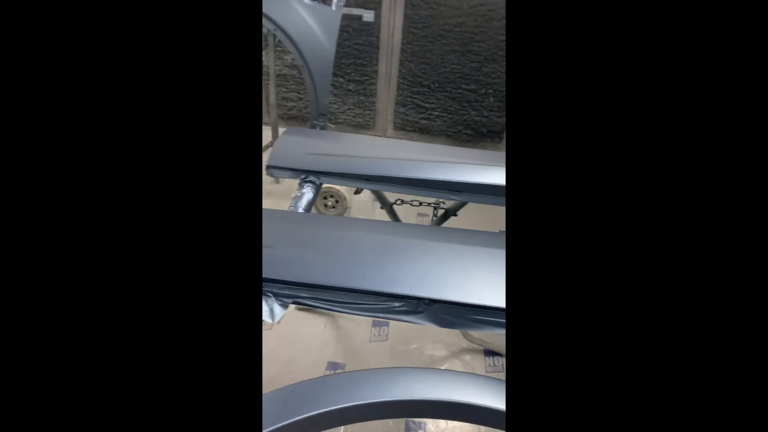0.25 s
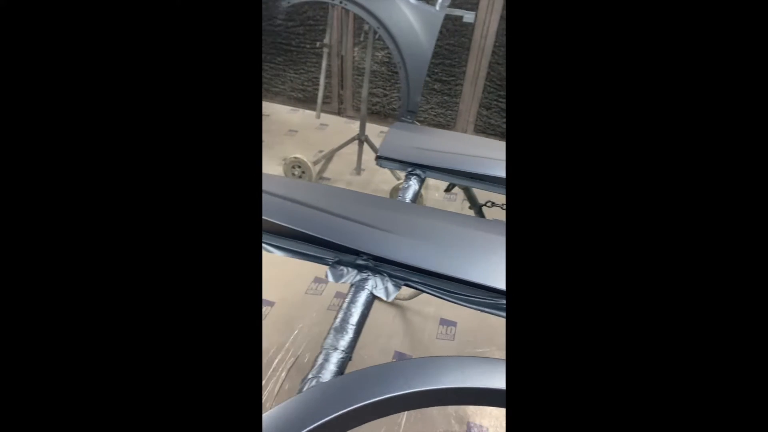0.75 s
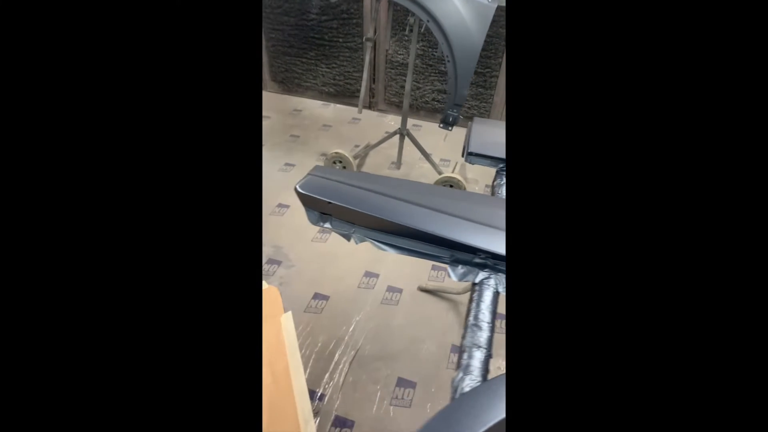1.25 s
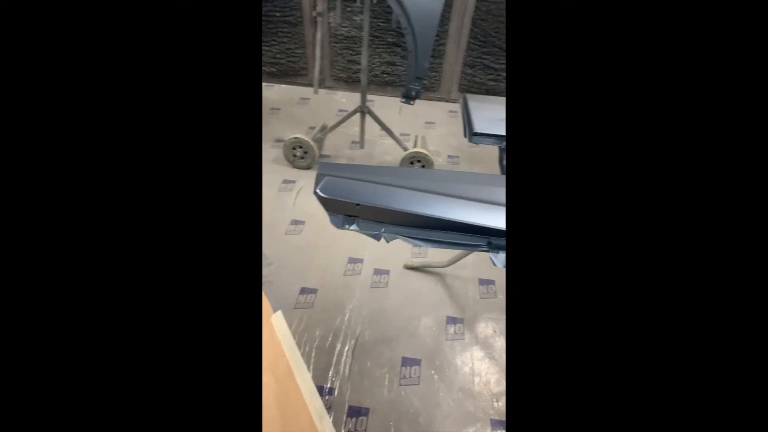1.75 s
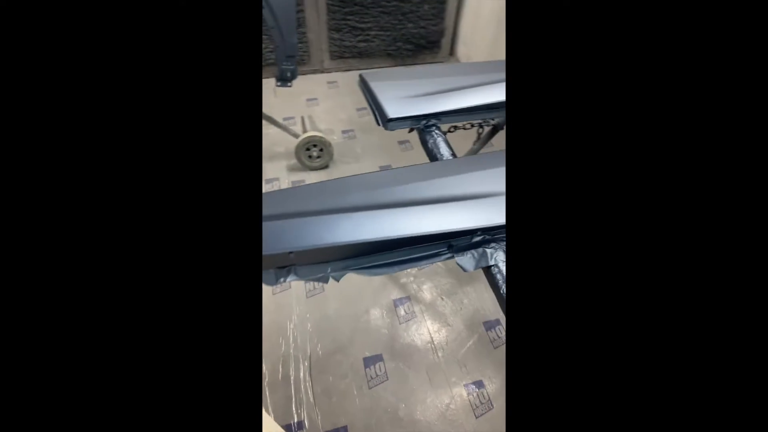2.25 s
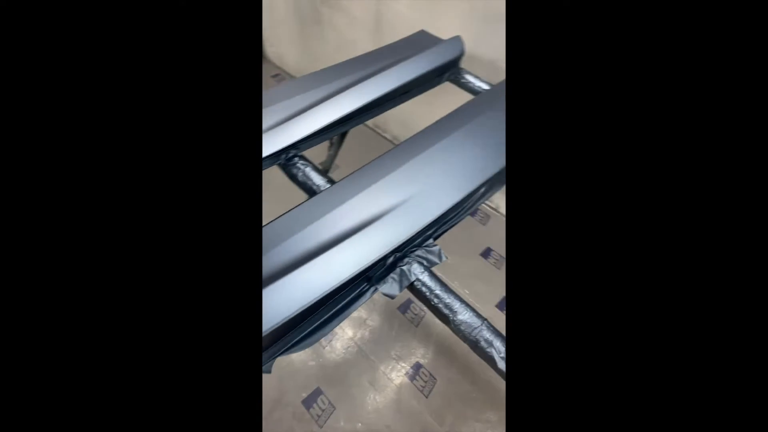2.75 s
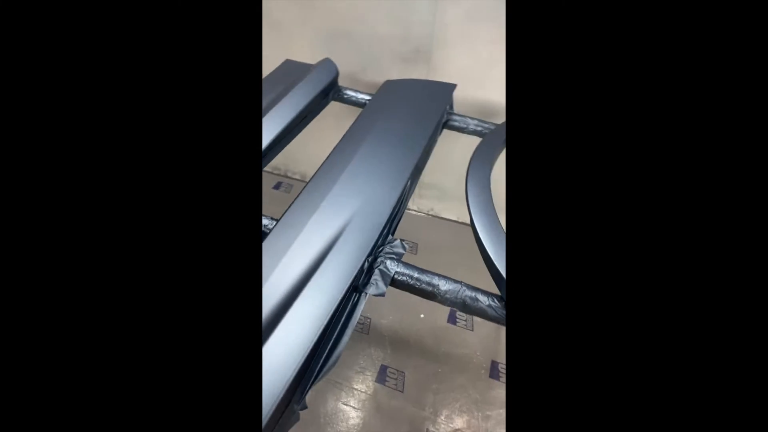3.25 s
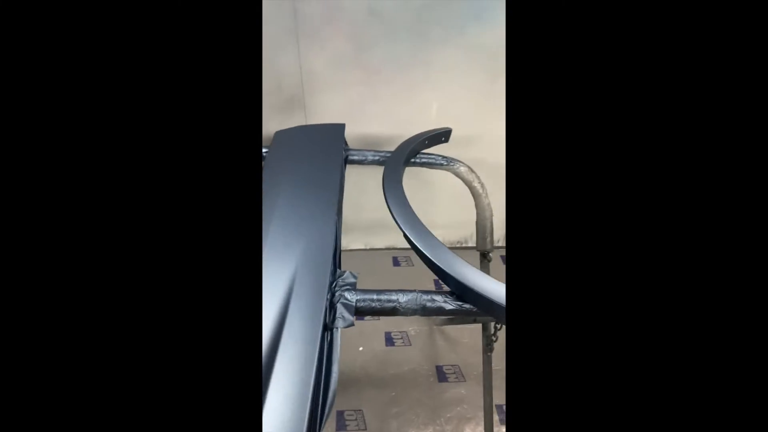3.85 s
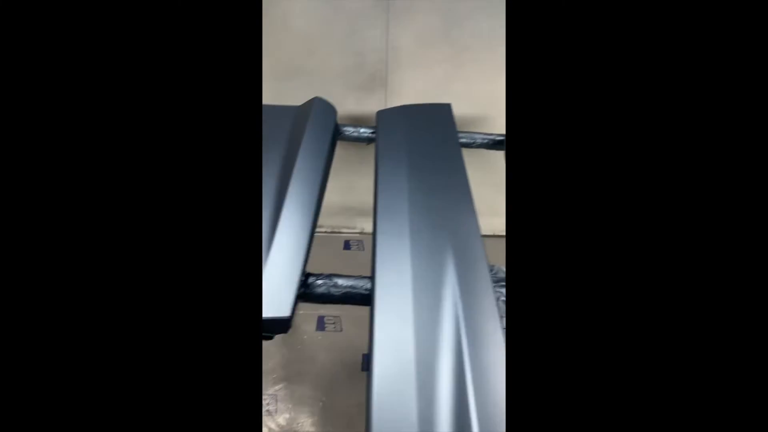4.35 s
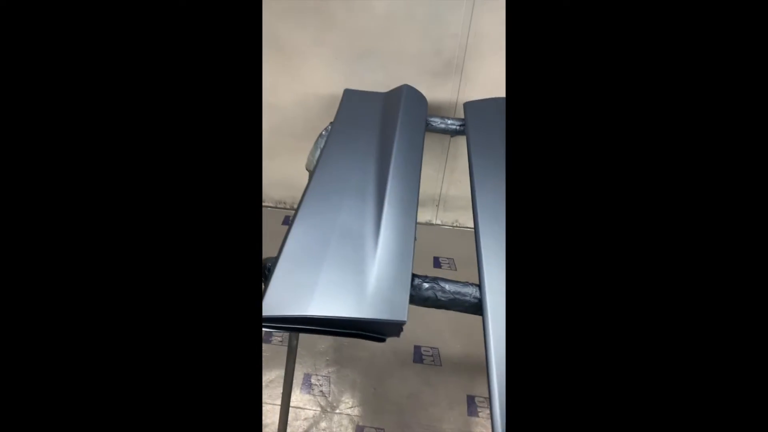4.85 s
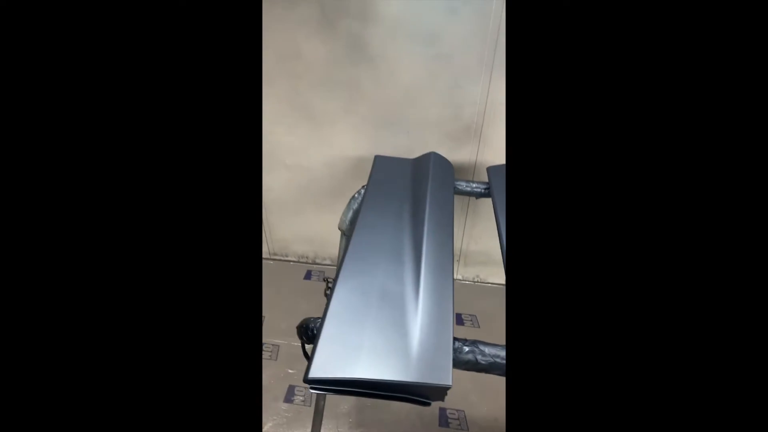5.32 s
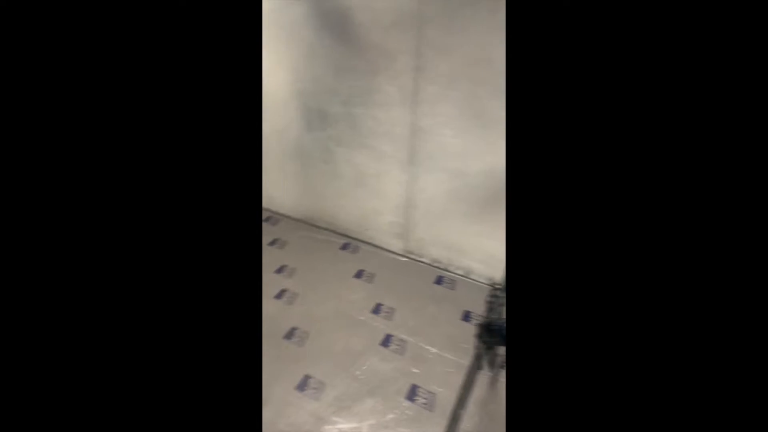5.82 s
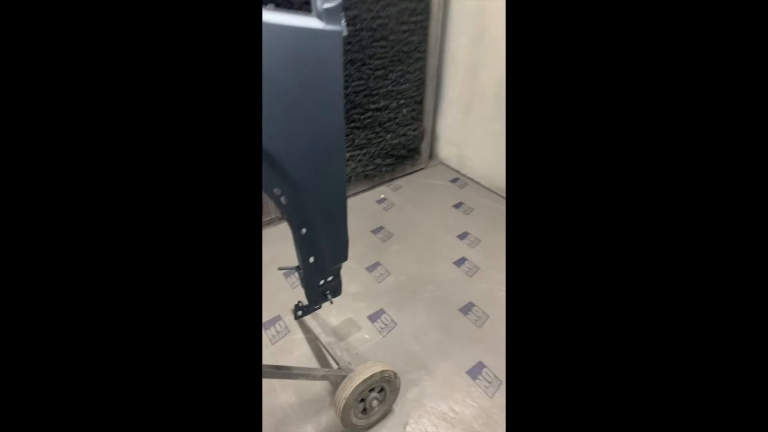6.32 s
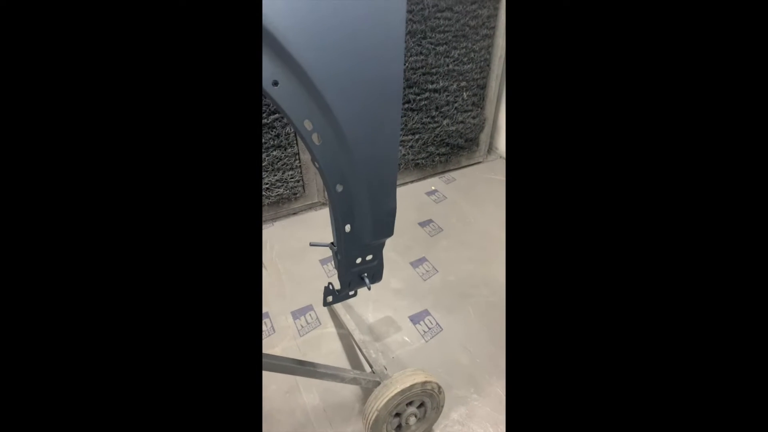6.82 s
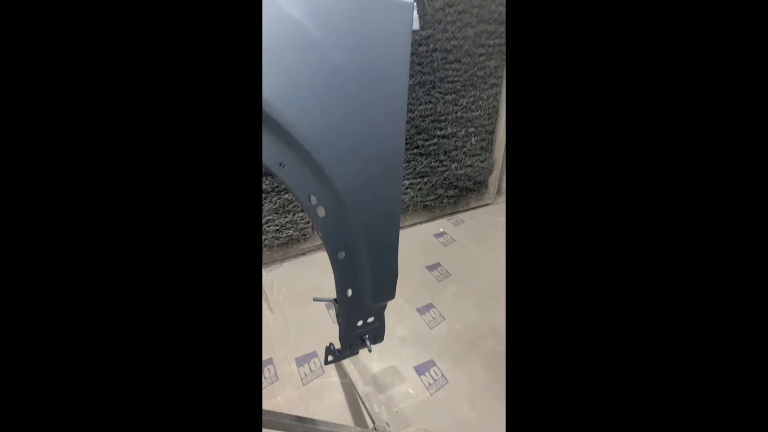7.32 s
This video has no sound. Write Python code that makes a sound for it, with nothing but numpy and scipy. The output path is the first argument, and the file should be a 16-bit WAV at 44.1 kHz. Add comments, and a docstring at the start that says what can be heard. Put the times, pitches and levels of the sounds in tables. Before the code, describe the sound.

Inside a hard-walled spray booth, ventilation roars without pause: dense low turbulent air, a blurred fan hum and a thin hiss from filter mats. The hum starts strong, then fades and surges as the handheld phone moves around painted panels. Faint ticks and rustles of floor sheeting come underfoot, clearest around one and a half seconds. Late on, the deep rumble grows.

```python
"""Inside a spray booth, a phone is carried slowly round painted panels while the ventilation runs steadily.
From the start, turbulent air roars through the booth's low resonances, fans hum and filter mats hiss.
The hum begins strong, then its tones fade and swell along the walk through standing waves and surge briefly.
The floor sheet ticks and rustles faintly under the shoes, most densely near 1.5 s; the hard walls answer.
Late in the walk, after about 6 s, the deep rumble grows towards the far corner."""
import sys
import numpy as np
from scipy import signal
from scipy.fft import rfft, irfft
from scipy.io import wavfile
from scipy.ndimage import uniform_filter1d, minimum_filter1d

SR = 44100
rng = np.random.default_rng(int(sys.argv[2]) if len(sys.argv) > 2 else 0)


def generate_wav(signal):
    """Clip the signal to [-1, 1] and save it as 16-bit WAV at the path in sys.argv[1]."""
    frames = np.transpose(np.atleast_2d(signal))
    scaled = np.clip(frames, -1, 1) * 32767
    pcm = np.round(scaled).astype(np.int16)
    wavfile.write(sys.argv[1], SR, pcm)


N = 334278
TIME = np.arange(N) / SR
HZ = np.fft.rfftfreq(N, 1 / SR)


def gain_of(db):
    """Decibels to amplitude gain."""
    return 10 ** (np.asarray(db) / 20)


def evened(x):
    """Scales a signal to rms 1."""
    return x / np.sqrt(np.mean(abs(x) ** 2) + 1e-20)


def spectrum_curve(points):
    """Joins the points of a spectrum table on a log-frequency axis."""
    hz, value = np.transpose(points)
    return np.interp(np.log(HZ + 1), np.log(hz + 1), value)


def time_curve(points):
    """Joins the points of a time table, sample by sample."""
    s, value = np.transpose(points)
    return np.interp(TIME, s, value)


def wander(rate_hz):
    """Slow random movement of rms 1: noise kept mostly below rate_hz."""
    noise = rfft(rng.standard_normal(N))
    return evened(irfft(noise / (1 + (HZ / rate_hz) ** 4), N))


def port_noise(density_db):
    """Noise spectra at the two microphone ports: alike in the bass, the left port leading higher up."""
    # Likeness of the two ports. Each row: frequency in Hz, coherence from 0 to 1.
    likeness = [(30, .99998), (110, .999), (190, .99), (300, .96), (430, .85), (600, .62), (1050, .55),
                (1400, .64), (2200, .48), (3400, .62), (4200, .9), (4700, .995), (6000, .98), (9000, .99),
                (15000, .99)]
    # Lead of the left port, close to a plain delay in the treble. Each row: frequency in Hz, phase in radians.
    lead = [(0, 0), (330, 0), (500, .3), (1250, .1), (2200, 1.3), (3300, 1.3), (4100, 2), (4700, 3.14),
            (5400, 4.3), (15200, 18.85)]
    shared, other = rfft(rng.standard_normal((2, N)))
    same = np.clip(spectrum_curve(likeness), 0, 1)
    lag = np.exp(-1j * np.interp(HZ, *np.transpose(lead)))
    right = lag * (same * shared + np.sqrt(1 - same ** 2) * other)
    return np.array([shared, right]) * gain_of(density_db) * np.sqrt(SR / 2)


def filter_hiss(shade_hz=7000, follow=1.1, flicker_db=0.5):
    """Air through the filter mats hisses; the highest hiss is the most directional."""
    # Hiss of the mats. Each row: frequency in Hz, density in dB per Hz.
    hiss = [(1000, -100), (3000, -91), (4100, -84.6), (4700, -86), (5600, -85.9), (6500, -87.5),
            (7500, -90), (8200, -87), (9200, -89), (11000, -93), (13000, -94), (15700, -99)]
    # How squarely the phone faces the filters; only the departure from the mean is heard.
    # Each row: time in seconds, hiss in dB before the factor follow.
    facing = [(0.0, -57), (0.74, -58), (1.06, -55.5), (1.33, -58.5), (2.57, -58), (3.02, -56),
              (3.85, -55.5), (4.4, -56), (6.14, -58.5), (7.58, -61)]
    facing_db = time_curve(facing)
    air = port_noise(spectrum_curve(hiss))
    wide = 1 / (1 + (HZ / shade_hz) ** 4)
    beamed = irfft(air * (1 - wide), N)
    beamed = beamed * gain_of(follow * (facing_db - facing_db.mean()))
    flicker = gain_of(flicker_db * wander(18))
    return (irfft(air * wide, N) + beamed) * flicker


def booth_echo(x, build_s=0.003):
    """The hard walls throw a sound back as a dense tail that builds quickly and loses its treble first."""
    # Reverberation of the booth. Each row: frequency in Hz, time to fall by 60 dB in seconds.
    echo = [(2000, 0.53), (6000, 0.23), (10000, 0.23), (15000, 0.19)]
    noise = irfft(port_noise(0), N)[:, :SR // 2]
    hz, t, z = signal.stft(noise, SR, nperseg=256)
    t60 = np.interp(hz, *np.transpose(echo))[:, None]
    decay = (1 - np.exp(-t / build_s)) * gain_of(-60 * t / t60)
    tail = signal.istft(z * decay, SR, nperseg=256)[1]
    tail = tail / np.linalg.norm(tail[0])
    return signal.oaconvolve(x[None], tail, axes=1)[:, :N]


def floor_sheet(grain_db=5, grain_hz=220, echo_db=0.0):
    """Soles snap and rub the loose sheet: brief ticks and grainy rustles, answered by the booth."""
    # Colour of a sole on the sheet. Each row: frequency in Hz, relative density in dB.
    sole = [(800, -20), (2300, -5), (3200, 3.5), (4200, 0), (5200, -1.5), (5900, .5), (7500, -1),
            (9500, -1.5), (11500, -3), (13500, -5.5), (15500, -5.5)]
    # Ticks under a sole. Each row: start in seconds, level in dB, tilt in dB per octave above sheet_hz.
    ticks = [(0.2178, -44, -10), (0.6738, -43, -5), (1.3477, -39, -7), (1.5385, -33, 0), (1.543, -26.5, 0),
             (1.583, -40, -6), (2.0466, -41, -9), (2.088, -39.5, -10), (2.327, -37, -11), (2.555, -42, -9),
             (2.8229, -41, -11), (3.9523, -43, -5)]
    # Rustles as a foot rolls or turns. Each row: middle in seconds, half length in seconds, level in dB
    # before the grain, tilt in dB per octave above sheet_hz.
    rustles = [(1.1, .13, -55, -7), (1.562, .014, -45, -2), (1.59, 0.012, -47, -4), (1.62, .025, -53, -4),
               (2.08, 0.044, -57, -10), (2.838, 0.023, -48.5, -10), (4.032, 0.08, -52, -3),
               (4.96, .07, -54, -5), (6.297, .035, -51, -3)]
    sheet_hz = 5900  # above this a soft contact loses its treble
    tick_rise_s, tick_t60_s = 0.00079, 0.026
    out = np.zeros((2, N))
    rub = port_noise(spectrum_curve(sole))
    octaves = np.log2(np.maximum(HZ / sheet_hz, 1))
    grains = evened(gain_of(grain_db * wander(grain_hz)))
    for s, db, tilt_db in ticks:
        age = np.clip(TIME - s, 0, 2 * tick_t60_s)
        rise = np.minimum(age / tick_rise_s, 1)
        snap = rise * gain_of(db - 60 * age / tick_t60_s)
        out += snap * evened(irfft(rub * gain_of(tilt_db * octaves), N))
    for s, half_length, db, tilt_db in rustles:
        roll = np.maximum(1 - ((TIME - s) / half_length) ** 2, 0) * gain_of(db)
        out += roll * grains * evened(irfft(rub * gain_of(tilt_db * octaves), N))
    return out + gain_of(echo_db) * booth_echo(out[0])


def walk_through(spectrum, ripple_db=3.5, blur_hz=3400, count=24):
    """Reflections add up differently at each spot: a fine spectral ripple drifts with the walk."""
    out = np.zeros((2, N))
    place = TIME / TIME[-1] * (count - 1)
    # long waves change little, short ones blur
    depth_db = ripple_db * HZ ** 2 / (HZ ** 2 + 400 ** 2) / (1 + (HZ / blur_hz) ** 2)
    for spot in range(count):
        chance = rng.standard_normal(len(HZ))
        ripple = evened(signal.oaconvolve(chance, np.hanning(260), "same"))
        nearness = np.maximum(1 - abs(place - spot), 0)
        out += irfft(spectrum * gain_of(depth_db * ripple), N) * nearness
    return out


def roar(gust_hz=11):
    """Turbulent duct air, coloured by resonances; its registers gust apart and swell with position."""
    # Roar of the air in the ducts. Each row: frequency in Hz, density in dB before each register is levelled.
    duct_air = [(20, -73), (33, -54.5), (45, -46), (100, -45.5), (180, -41), (330, -42.5), (420, -43),
                (600, -54.5), (900, -56), (1350, -59), (2000, -70.5), (3000, -77), (4500, -92.5),
                (9000, -112)]
    # Resonances and dips of booth and ducts. Each row: centre in Hz, width in Hz, lift in dB.
    booth = [(51.6, 5.4, -5.5), (67.2, 16, 6), (78, 7.7, -5.5), (161, 5.8, 4), (192, 10.4, 4.5),
             (227, 74, 2.5), (267, 16, 4.5), (308, 21, 4), (339, 6.6, -1), (398, 9.1, -3), (443, 18, -0.5),
             (455.5, 35, 7), (493.4, 11.5, -4.5), (514, 25, 3.5), (542, 12, 5.5), (573, 45, 0.5),
             (642, 18, 6.5), (695, 31, 4), (862.5, 9.4, 5), (963, 9.9, 5), (1035, 31, 1), (1360, 30, 0.5),
             (2060, 360, 3)]
    # Deep rumble, growing towards the far corner. Each row: time in seconds, swell in dB before the share.
    rumble = [(0, -0.5), (2.6, -1.5), (3.4, -1.5), (5.7, -2), (6.3, 3.5), (7.3, 3.5)]
    # Duct drone, strongest near the filter walls. Each row: time in seconds, swell in dB before the share.
    drone = [(0, 0.5), (1.3, 2.5), (2.3, 1.5), (4.0, 1), (4.9, -3), (6.4, 2), (7.58, 0.5)]
    # Registers from low to high. Each row: level in dB before the swells, share of the rumble's swell,
    # share of the drone's swell, gusts in dB rms before levelling (the sign only flips the chance).
    registers = [(-29.5, 0.83, 0.023, -0.5), (-26, 0.054, 0.088, 1), (-21.5, 0, 0.89, 0.33),
                 (-26, 0.088, -0.072, 1.14), (-29.5, 0.54, -0.23, 0.7), (-37.5, 0.49, -0.48, 0.86)]
    colour_db = sum(lift / (1 + (2 * (HZ - hz) / width) ** 2) for hz, width, lift in booth)
    air = rfft(walk_through(port_noise(spectrum_curve(duct_air) + colour_db)))
    splits_hz = (105, 170, 500, 850, 1550)
    below = [0] + [1 / (1 + (HZ / hz) ** 12) for hz in splits_hz] + [1]
    rumble_db, drone_db = time_curve(rumble), time_curve(drone)
    out = np.zeros((2, N))
    for lower, upper, row in zip(below, below[1:], registers):
        db, with_rumble, with_drone, gust_db = row
        register = irfft(air * (upper - lower), N) * gain_of(gust_db * wander(gust_hz))
        # the mean flow is steady: over half a second only position swells it
        power = uniform_filter1d((register ** 2).mean(0), size=SR // 2)
        register = register / np.sqrt(power)
        out += register * gain_of(db + with_rumble * rumble_db + with_drone * drone_db)
    return out


def hum(waver_hz=1.192, waver_rate_hz=9, surge_trim_db=-0.5):
    """Fan and duct tones, blurred by turbulence, cross standing waves; a caught eddy rings clear off pitch."""
    # Tones of the fans and of the ducts they ring. Each row: pitch in Hz, width of the blur in Hz,
    # steady part relative to the blur's rms, right minus left in dB.
    tones = [(218.2, 5.1, 0.95, 0.3), (253.6, 6, 0.31, 1.5), (290, 5.9, 0.29, 1.5), (444, 4.2, 0.9, 1),
             (345, 8.5, 0.11, 3), (151.1, 5.1, 0.46, 0.5)]
    # Walks through the standing waves, one a tone. Each row: time in seconds, level in dB before the balance.
    blade, low_duct, high_duct = [(0, -18), (1.3, -25), (1.95, -26), (2.6, -25.5), (3.1, -26), (3.8, -30),
                                  (4.8, -29), (5.2, -22), (5.8, -24.5), (6.4, -20), (7.05, -23.5),
                                  (7.58, -24)], [(0, -28), (.6, -24.5), (1.6, -31), (3.2, -32.5),
                                                 (4.1, -25.5), (5.5, -23.5), (6.1, -25.5), (7.2, -23),
                                                 (7.58, -29)], [(0, -23.5), (1.2, -25.5), (2.1, -32),
                                                                   (4.45, -30.5), (5.3, -24), (6.3, -25),
                                                                   (6.9, -33), (7.58, -39)]
    overtone, mid_duct, deep_duct = [(0, -28), (.9, -25), (1.45, -28), (2.1, -46), (2.7, -33), (3.5, -45),
                                     (4.1, -24), (4.7, -32.5), (5.55, -30), (6.2, -24.5), (6.95, -34),
                                     (7.58, -23)], [(0, -40), (1.8, -26), (2.5, -34), (3.4, -27),
                                                       (4.3, -27.5), (5, -37), (7.58, -48)], [(0, -38), (2, -37), (2.8, -30),
                                                                         (4.4, -27), (5.1, -28.5),
                                                                         (6.1, -27.5), (7.58, -26.5)]
    walks = (blade, low_duct, high_duct, overtone, mid_duct, deep_duct)
    # Strongest surges. Each row: middle in seconds, pitch in Hz before the waver, half length in seconds,
    # peak in dB before the trim and the balance.
    surges = [(0.116, 220.3, 0.24, -12), (0.31, 293, 0.08, -14.5), (0.36, 219.5, 0.1, -10.5),
              (0.41, 257.6, 0.088, -16), (0.5, 222, 0.059, -11.5), (0.72, 292.7, 0.12, -12.5),
              (0.845, 215.6, 0.088, -11), (0.9, 443, 0.086, -13.5), (0.94, 253, 0.12, -20),
              (1.02, 223, 0.054, -13), (1.12, 448, 0.07, -15.5), (1.252, 219.5, 0.086, -10),
              (1.402, 448, 0.038, -10.5), (1.53, 218, 0.14, -12.0), (1.636, 445.2, 0.12, -17),
              (1.798, 294.6, 0.12, -15), (2.465, 219.4, 0.18, -13.0), (2.7, 293, 0.07, -14.5),
              (2.93, 218, 0.066, -16), (3.01, 297, 0.067, -16.5), (3.19, 216, 0.15, -16),
              (3.541, 255, 0.058, -11.0), (3.826, 445, 0.066, -15.0), (3.89, 249, 0.12, -15),
              (4.45, 446, 0.072, -14.5), (4.49, 221, 0.083, -15.5), (4.666, 256, 0.11, -12.5),
              (4.816, 293.3, 0.17, -12.5), (5.08, 221.6, 0.13, -13.5), (5.33, 253, 0.14, -15),
              (5.46, 220.6, 0.12, -13.5), (5.47, 251, 0.096, -14), (5.642, 289, 0.069, -12),
              (5.721, 216, 0.056, -13.5), (5.96, 443, 0.11, -16.5), (6.03, 213, 0.052, -13.5),
              (6.19, 444.6, 0.2, -17.5), (6.227, 218.6, 0.2, -9.5), (6.36, 440.7, 0.14, -17),
              (6.52, 290, 0.075, -19), (6.58, 256, 0.086, -13.5), (6.61, 216.6, 0.13, -8.0),
              (6.856, 217, 0.05, -9), (6.88, 255.4, 0.14, -14.5), (7.14, 253, 0.076, -15.0),
              (7.23, 213, 0.06, -14), (7.44, 220, 0.083, -11.5), (7.492, 257, 0.066, -16)]
    catch_hz = 15  # a surge belongs to the tone within this distance
    out = np.zeros((2, N))
    for (hz, width_hz, steady, right_db), walk in zip(tones, walks):
        blur = steady + evened(wander(width_hz) + 1j * wander(width_hz))
        blur = blur / np.sqrt(uniform_filter1d(abs(blur) ** 2, size=SR // 4) + 1e-9)
        waver = waver_hz * np.cumsum(wander(waver_rate_hz)) / SR  # in cycles
        carrier = np.exp(2j * np.pi * (hz * TIME + waver))
        tone = np.sqrt(2) * (blur * carrier).real * gain_of(time_curve(walk))
        for s, surge_hz, half_length, db in surges:
            if abs(surge_hz - hz) < catch_hz:
                near = abs(TIME - s) < half_length
                age = TIME[near] - s
                caught = np.cos(np.pi / 2 * age / half_length) ** 2
                cycles = hz * s + surge_hz * age + waver[near]  # meets the carrier's phase at the middle
                ring = gain_of(db + surge_trim_db) * np.cos(2 * np.pi * cycles)
                tone[near] += caught * (ring - tone[near])  # the clear ring replaces the blurred tone
        out += tone * gain_of([[-right_db / 2], [right_db / 2]])
    return out


def scene():
    """Everything heard in the booth, at the two ports of the phone."""
    return roar() + hum() + filter_hiss() + floor_sheet()


def record(dry, ceiling=.85, edge_hz=15800):
    """The phone's limiter eases the highest peaks down; then a low-pass sets its band limit."""
    room = np.minimum(1, ceiling / (abs(dry).max(0) + 1e-9))
    limited = dry * uniform_filter1d(minimum_filter1d(room, size=900), size=800)
    band = signal.firwin(511, edge_hz, window=("kaiser", 9), fs=SR)
    return signal.oaconvolve(limited, band[None], "same")


dry = scene()
out = record(dry)
generate_wav(out)
```